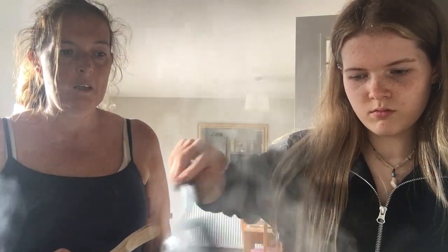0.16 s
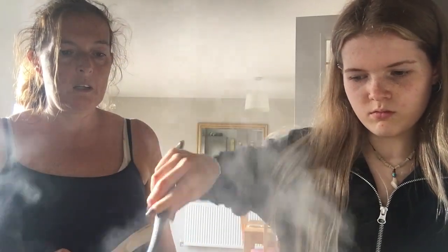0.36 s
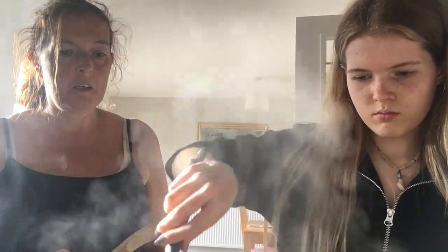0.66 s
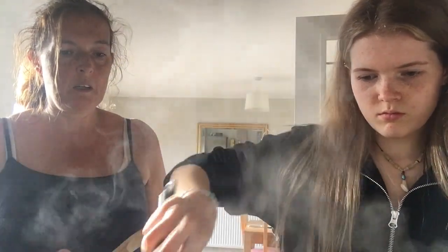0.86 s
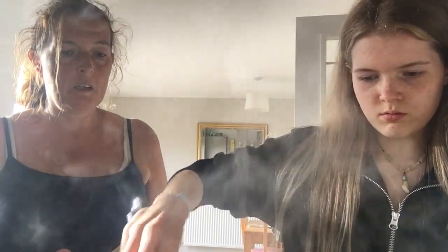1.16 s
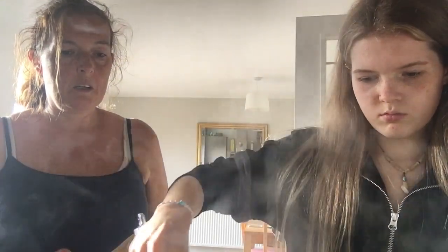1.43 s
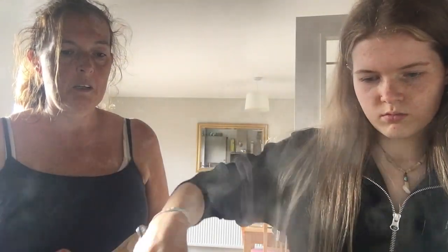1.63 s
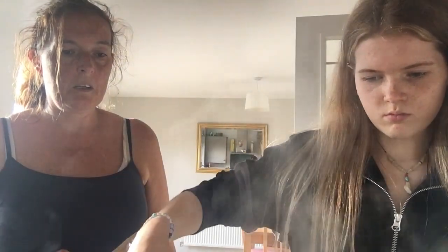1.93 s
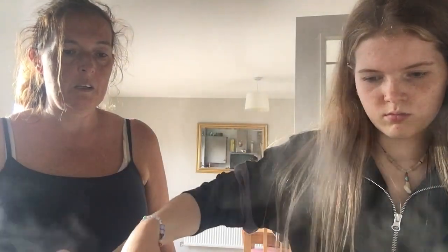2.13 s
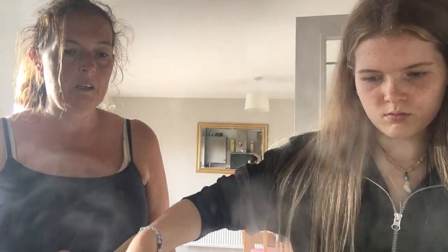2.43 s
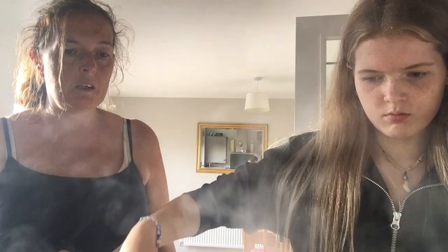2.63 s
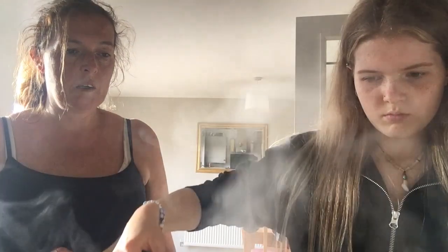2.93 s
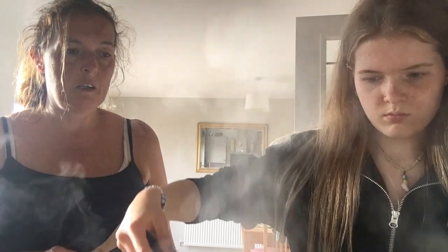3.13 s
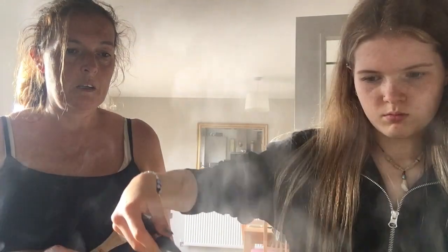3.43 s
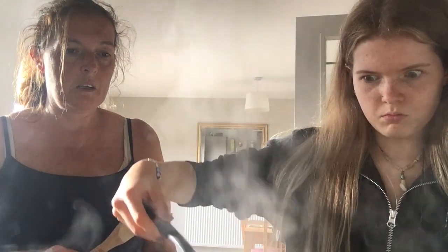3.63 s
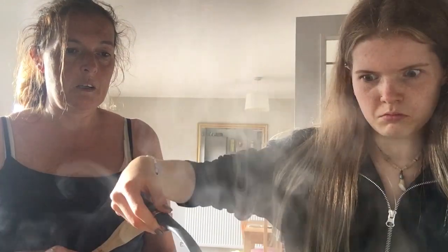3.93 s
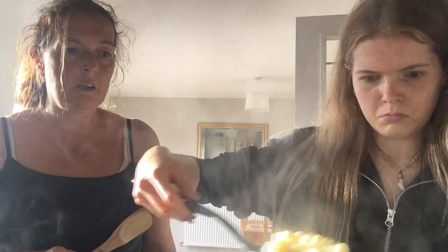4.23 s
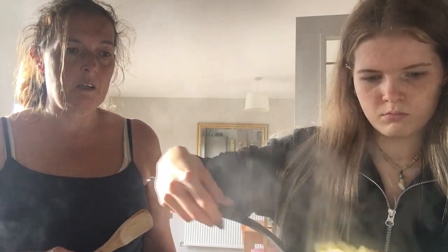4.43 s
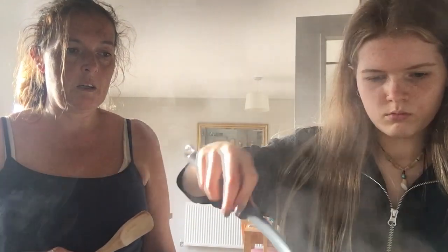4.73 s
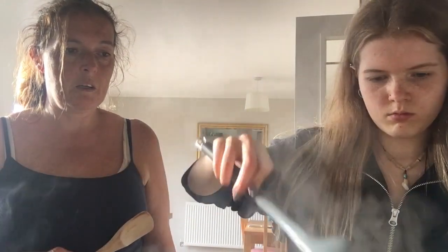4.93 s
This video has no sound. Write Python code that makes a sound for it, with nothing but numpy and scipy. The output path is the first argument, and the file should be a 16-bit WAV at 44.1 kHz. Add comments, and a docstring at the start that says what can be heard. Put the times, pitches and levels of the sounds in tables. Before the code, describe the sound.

Dull metallic knocks and short juddering scrapes of a spoon in a full saucepan, with light ticks, over a fuzzy hum that drops and rises.

```python
"""Serving from a saucepan in a small kitchen, over a hiss and a fuzzy hum (filtered noise) that step together.
The background starts strong and drops; a spoon taps the rim (decaying modes plus a noise crack).
It then scrapes and judders over the bottom (random slips, wavering sine), amid sharp ticks (noise bursts),
and knocks the pan, whose ring is damped by the food inside. The background steps up under later knocks.
The spoon settles in a short rattle, a faint whistling tone swells and fades; a click, and the background drops."""
import sys
import numpy as np
from scipy import signal
from scipy.fft import rfft, irfft, next_fast_len
from scipy.io import wavfile
from scipy.ndimage import uniform_filter1d, map_coordinates

SR = 44100
rng = np.random.default_rng(int(sys.argv[2]) if len(sys.argv) > 2 else 0)


def persist_wave(psi):
    """Save psi, clipped to +-1, as 16-bit WAV."""
    counts = np.round(np.clip(psi, -1, 1) * 32767).astype(np.int16)
    wavfile.write(sys.argv[1], SR, np.atleast_2d(counts).T)


N = 223888
TIME = np.arange(N) / SR
AGE = np.arange(SR // 2) / SR  # seconds since a blow


def amp(db):
    """Decibels to gain."""
    return 10 ** (np.asarray(db) / 20)


def unit(x):
    """Scale to rms 1."""
    return x / np.sqrt(np.mean(x ** 2) + 1e-20)


def unit_peak(x, size=441):
    """Scale so that the loudest hundredth of a second has rms 1."""
    power = uniform_filter1d(x ** 2, size, mode="constant")
    return x / np.sqrt(power.max() + 1e-20)


def along(points, hz):
    """Read (Hz, value) points on a log frequency axis."""
    f, v = np.transpose(points)
    return np.interp(np.log(hz + 1), np.log(f + 1), v)


def filtered(x, response):
    """Multiply the spectrum of x by a response of frequency."""
    size = next_fast_len(len(x) + SR // 2)
    spectrum = rfft(x, size) * response(np.fft.rfftfreq(size, 1 / SR))
    return irfft(spectrum, size)[:len(x)]


def noise(spectrum, size):
    """Coloured noise of rms 1."""
    return unit(filtered(rng.standard_normal(size), lambda f: amp(along(spectrum, f))))


def resonance(f, hz, width_hz):
    """Response of one damped mode."""
    return 1j * f * width_hz / (hz * hz - f * f + 1j * f * width_hz)


def fuzzy_tone(hz, width_hz):
    """Noise through two identical damped modes in series, rms 1."""
    return unit(filtered(rng.standard_normal(N), lambda f: resonance(f, hz, width_hz) ** 2))


def wobble(knots_per_s, size=N):
    """Smooth random curve through random knots."""
    knots = rng.standard_normal(int(size * knots_per_s / SR) + 4)
    return map_coordinates(knots, [np.arange(size) * knots_per_s / SR])


def fade(t60_s, t=AGE):
    """Decay by 60 dB in t60_s."""
    return np.exp(-np.log(1000) * t / t60_s)


def attack(rise_s):
    """Exponential onset of a blow."""
    return 1 - np.exp(-AGE / rise_s)


def add(track, s, sound):
    """Mix a sound in at s seconds."""
    part = track[max(round(s * SR), 0):][:len(sound)]
    part += sound[:len(part)]


def patches(x, depth_db, size=1024):
    """Resonances that come and go as the point of contact moves."""
    z = signal.stft(x, nperseg=size)[2]
    field = uniform_filter1d(rng.standard_normal(z.shape), size=4, axis=0)
    field = uniform_filter1d(field, size=3, axis=1)
    return signal.istft(z * amp(depth_db * unit(field)), nperseg=size)[1][:len(x)]


def ring(modes, scatter_db, waver_rad):
    """Decaying modes; their strengths depend on the spot struck, and the resting spoon makes them waver."""
    total = np.zeros(len(AGE))
    for hz, db, t60_s in modes:
        phase = 2 * np.pi * hz * AGE + waver_rad * wobble(4 * np.sqrt(hz), size=len(AGE))
        strength = rng.choice([-1, 1]) * amp(db + scatter_db * rng.standard_normal())
        total += strength * fade(t60_s) * np.sin(phase)
    return total


def contact(spectrum, t60_s, rebound_s, rebound, snap=1.6, snap_t60_s=0.015):
    """A blow's first snap, its dying crack, and a rebound a moment later."""
    again = (AGE > rebound_s) * fade(t60_s, np.abs(AGE - rebound_s))
    envelope = np.hypot(fade(t60_s) + snap * fade(snap_t60_s), rebound * again)
    return unit_peak(patches(noise(spectrum, len(AGE)), depth_db=2.0) * envelope)


# stronger background: (from [s], to [s])
LOUD_SPELLS = [(-0.1, 0.395), (2.707, 4.7)]
# hiss colour outside and inside the spells: (frequency [Hz], density [dB per Hz])
QUIET_AIR = [(15, -49.5), (25, -35), (43, -3), (76, -3.5), (161, -6.5), (293, -10.5), (354, -4),
             (463, -13.5), (516, -13), (887, -21), (1130, -20), (1330, -24), (4490, -33), (13600, -44.5),
             (16000, -58.5)]
LOUD_AIR = [(15, -51), (25, -18), (40, -6.5), (97, 0), (149, -6), (263, -5), (317, -12), (354, -3.5),
            (476, -15.5), (591, -15.5), (1230, -23), (1330, -21), (2350, -30), (14000, -43.5), (16000, -48)]
# hum components: (frequency [Hz], width [Hz], level outside the spells [dB])
HUM = [(116.8, 15, -69.5), (351.7, 7.6, -73), (376.8, 31, -76)]
QUIET_AIR_DB, LOUD_AIR_DB, HUM_STEP_DB = -60.5, -52.84, 6.6
STEP_S = 0.0055


def background():
    """Hiss is coloured noise, hum is noise through narrow resonances; both step between two strengths."""
    loud = np.zeros(N)
    for start, end in LOUD_SPELLS:
        loud += np.clip(np.minimum(TIME - start, end - TIME) / STEP_S + .5, 0, 1)
    air = (1 - loud) * amp(QUIET_AIR_DB) * noise(QUIET_AIR, N)
    air += loud * amp(LOUD_AIR_DB) * noise(LOUD_AIR, N)
    hum = sum(amp(db) * fuzzy_tone(hz, width_hz) for hz, width_hz, db in HUM)
    return air * amp(0.77 * wobble(2.95)) + hum * amp(HUM_STEP_DB * loud)


# spoon on the rim: (time [s], level [dB])
RIM_TAPS = [(0.5129, -38.5)]
# spoon modes: (frequency [Hz], relative level [dB], t60 [s])
SPOON_MODES = [(90, -7.5, 0.23), (150.4, -6, 0.19), (267.6, -4.5, 0.16), (763, -14, 0.14), (1312, 0, 0.066),
               (1750, -18, 0.052), (2234, -6, 0.053), (3100, -10, 0.12), (4310, -0.5, 0.045),
               (6330, 3, 0.033)]
# contact noise on the rim: (frequency [Hz], density [dB per Hz])
RIM_CRACK = [(47, -35), (80, 1), (283, -3), (395, -13), (768, -10), (980, -11), (1310, -13.5), (2220, -6.5),
             (2660, -25.5), (4420, -13), (4940, -19), (6170, -16), (16000, -46)]


def rim_tap():
    """The spoon meets the rim with a thin, short clack: spoon modes plus contact noise."""
    out = np.zeros(N)
    for s, db in RIM_TAPS:
        modes = unit_peak(ring(SPOON_MODES, scatter_db=1.0, waver_rad=0.64))
        crack = contact(RIM_CRACK, t60_s=0.073, rebound_s=0.0063, rebound=0.23, snap=0.27)
        tap = (modes + amp(2.0) * crack) * attack(0.0017)
        add(out, s, amp(db) * unit_peak(tap))
    return out


# resonances of the spoon pressed on the pan: (frequency [Hz], width [Hz], gain over the rest [dB])
PRESSED = [(717, 70, 4.5), (963, 125, 5), (1390, 99, -5.5), (1997, 140, 13.5), (2950, 110, -1),
           (4260, 150, -0.5), (5850, 430, 10)]


def friction(spectrum, slips_per_s, spread_db, shifting_db):
    """Tiny slips of uneven size, heard through the spoon and the pan."""
    slips = (rng.random(N) < slips_per_s / SR) * rng.standard_normal(N)
    force = patches(slips, shifting_db) * amp(spread_db * wobble(180))

    def body(f):
        return 1 + sum(amp(db) * resonance(f, hz, width_hz) for hz, width_hz, db in PRESSED)

    return unit(filtered(force, lambda f: amp(along(spectrum, f)) * body(f)))


# strokes over the metal: (start [s], hardest push [s], end [s], rub at the push [dB],
# judder on landing [dB], judder at the push [dB])
STROKES = [(0.865, 0.966, 0.98, -38, -51.5, -34), (1.038, 1.106, 1.1406, -37.5, -38, -32),
           (1.175, 1.182, 1.204, -49, -50, -47), (1.255, 1.346, 1.42, -55.5, -54, -56),
           (1.599, 1.621, 1.732, -51, -52.5, -45)]
# friction colours: (frequency [Hz], density [dB per Hz])
RUB = [(110, -29), (190, -7), (221, -14), (258, 0), (301, -2.5), (383, -1.5), (574, -11.5), (691, -14.5),
       (1070, -13), (1460, -9.5), (2600, -40.5), (3380, -46), (5720, -120)]
GRIT = [(1410, -31), (2400, -6), (3000, -2.5), (3380, -7), (5180, -13), (6220, -15), (6520, -12.5),
        (10600, -21), (11600, -22.5), (16000, -33)]
SWELL_DB, EASE_DB, JUDDER_EASE_DB = 12, 5.5, 12  # pressure gained to the push; pressure, judder lost after
GRIT_DB, GRIT_FOLLOWS = -7, 0.83  # grit over rub at the push; dB of grit per dB of pressure
TOUCH_S, LIFT_T60_S, JUDDER_T60_S = 0.0028, 0.073, 0.2  # landing; rasp and judder die after lifting


def scrapes(judder_hz=148, stutter_db=1.0):
    """The dragged spoon is pressed, eases and lifts; it rasps, and sticks and slips with the pan's low mode."""
    juddering, rubbing, gritting = np.zeros((3, N))
    for start, push, end, rub_db, landing_db, judder_db in STROKES:
        moments = [start, push, end]
        pressure_db = np.interp(TIME, moments, [-SWELL_DB, 0, -EASE_DB])
        shaking_db = np.interp(TIME, moments, [landing_db, judder_db, judder_db - JUDDER_EASE_DB])
        landed = np.clip((TIME - start) / TOUCH_S, 0, 1)
        lifted_s = np.maximum(TIME - end, 0)
        touching = landed * fade(LIFT_T60_S, lifted_s)
        juddering += landed * fade(JUDDER_T60_S, lifted_s) * amp(shaking_db)
        rubbing += touching * amp(rub_db + pressure_db)
        gritting += touching * amp(rub_db + GRIT_DB + GRIT_FOLLOWS * pressure_db)
    # the spoon catches and lets go unevenly, so the whole rasp stutters
    stutter = unit(amp(stutter_db * wobble(90)))
    phase = 2 * np.pi * np.cumsum(judder_hz * (1 + 0.1714 * wobble(120))) / SR
    judder = unit(np.sin(phase) * amp(1.5 * wobble(59.85)))
    rub = friction(RUB, slips_per_s=2000, spread_db=0.6, shifting_db=2.5)
    grit = friction(GRIT, slips_per_s=4200, spread_db=2.0, shifting_db=4.0)
    return stutter * (juddering * judder + rubbing * rub + gritting * grit)


# sharp light ticks; the last is a click just before the background drops:
# (time [s], level [dB], centre [Hz])
TICKS = [(0.974, -54, 5860), (1.349, -60, 1960), (1.477, -60, 6450), (1.564, -66, 3980), (1.801, -64, 5840),
         (1.915, -70.5, 6260), (1.98, -70, 4050), (2.806, -66.5, 3200), (3.158, -63.5, 2940),
         (4.686, -61, 4400)]
# the spoon settles after the last knock: (from [s], to [s])
RATTLE_SPAN = (3.66, 3.75)
LANDING_DB, LANDING_HZ = -61.5, 4040
RATTLE_DB, RATTLE_HZ = -68, 6700  # pitch scatters half an octave either way


def ticks(rattle_count=4):
    """Single ticks, stroke landings and a short rattle: each is a noise burst in a broad, high resonance."""
    out = np.zeros(N)
    landings = [(stroke[0], LANDING_DB, LANDING_HZ) for stroke in STROKES]
    start, end = RATTLE_SPAN
    spacing_s = (end - start) / rattle_count
    rattle = []
    for k, (late, pitch) in enumerate(rng.random((rattle_count, 2))):
        rattle.append((start + spacing_s * (k + late), RATTLE_DB, RATTLE_HZ * 2 ** (pitch - .5)))
    for s, db, hz in TICKS + landings + rattle:
        burst = rng.standard_normal(len(AGE)) * fade(0.036)
        tick = filtered(burst, lambda f: resonance(f, hz, 0.63 * hz) ** 2)
        add(out, s, amp(db) * unit_peak(tick))
    return out


# blows on the pan: (time [s], bending note of the spoon [Hz], level before register offsets [dB],
# softness: treble lost [dB per octave], extra boom of the pan [dB])
KNOCKS = [(0.957, 388, -31, 6, -2), (1.041, 396, -38.5, 5.5, 17), (1.185, 403, -31.5, 0, -9),
          (1.2579, 320, -42.5, 1.7, -3), (1.42, 344, -46.5, 3.5, 0), (2.9022, 401.4, -30.5, 0.47, -6),
          (3.013, 410, -40.5, 3.5, 2), (3.2984, 366, -32, 1, 7.5), (3.618, 368, -37.5, 2, 12)]
# pan modes: (frequency [Hz], relative level [dB], t60 [s])
PAN_MODES = [(92, -5.5, 0.26), (148, 0.5, 0.14), (203.6, -2.5, 0.16), (317.7, -11, 0.18), (479, -14, 0.069),
             (536.5, -14.5, 0.17), (753, -14.5, 0.16), (990, -20, 0.18), (1110, -14, 0.14),
             (1253, -10.5, 0.052), (1306, -11.5, 0.12), (1502, -10, 0.089), (1807, -19, 0.14),
             (1983, -10.5, 0.078), (2495, -20.5, 0.12), (2730, -21, 0.12), (3290, -24, 0.26),
             (3445, -43, 0.19), (3920, -10, 0.058), (4440, -12.5, 0.091), (4810, -22.5, 0.19),
             (7550, -21, 0.042), (8240, -11, 0.06)]
# contact noise on the pan: (frequency [Hz], density [dB per Hz])
CRACK = [(120, -30), (200, -8), (432, -0.5), (623, -43.5), (749, -4), (899, -21.5), (1120, -13.5),
         (1680, -15), (2020, -20.5), (2330, -21.5), (3370, -15), (6050, -21), (8580, -18), (12800, -23.5),
         (16000, -35)]
# registers of a blow: (from [Hz], to [Hz])
BANDS = [(45, 115), (115, 260), (260, 650), (650, 2200), (2200, 6000), (6000, 17000)]
# strength of each register in a hard blow: level [dB]
HARD_BLOW_DB = [-15.5, 1.5, 1.5, -3, -1.5, -3.5]
SOFT_ABOVE_HZ = 136  # food on the spoon cushions everything above this


def knocks():
    """Each blow rings pan and spoon; a cushioned one loses treble, one that shoves the pan booms."""
    out = np.zeros(N)
    centres_hz = np.sqrt(np.prod(BANDS, axis=1))
    octaves = np.maximum(np.log2(centres_hz / SOFT_ABOVE_HZ), 0)
    for s, spoon_hz, level_db, softness, boom_db in KNOCKS:
        modes = ring(PAN_MODES + [(spoon_hz, 2, .12)], scatter_db=0.5, waver_rad=0.42) * attack(0.0018)
        crack = contact(CRACK, t60_s=0.073, rebound_s=0.0076, rebound=0.74) * attack(0.001)
        blow = unit_peak(modes) + crack
        levels_db = level_db + np.array(HARD_BLOW_DB) - softness * octaves
        levels_db[0] += boom_db
        for band, db in zip(BANDS, levels_db):
            bandpass = signal.butter(3, band, "bandpass", fs=SR, output="sos")
            add(out, s, amp(db) * unit_peak(signal.sosfilt(bandpass, blow)))
    return out


# faint tone: (from [s], to [s], level before the swell [dB])
WHISTLE = (3.74, 4.25, -69)


def whistle(hz=1315, width_hz=75):
    """A thin, fuzzy tone from narrow noise swells and fades in a half-sine."""
    start, end, db = WHISTLE
    swell = np.sin(np.pi * np.clip((TIME - start) / (end - start), 0, 1))
    return fuzzy_tone(hz, width_hz) * amp(db) * swell


# room decay: (frequency [Hz], t60 [s])
KITCHEN = [(100, 0.41), (500, 0.41), (3500, 0.48), (8000, 0.32), (15000, 0.2)]


def kitchen(x, size=256):
    """The walls answer with a short noise tail whose treble dies first."""
    hz, t, z = signal.stft(rng.standard_normal(len(AGE)), SR, nperseg=size)
    decay = fade(along(KITCHEN, hz)[:, None], t)
    tail = signal.istft(z * decay, SR, nperseg=size)[1][:len(AGE)]
    tail = tail * (1 - np.exp(-(AGE / 0.0065) ** 2))
    return signal.fftconvolve(x, tail / np.linalg.norm(tail))[:N]


def scene():
    """Spoon, pan and ticks close by, in the room; the tap on the rim is the driest of them."""
    tap = rim_tap()
    pan_and_ticks = scrapes() + ticks() + knocks()
    room = kitchen(amp(-14) * pan_and_ticks + amp(-18.0) * tap)
    return (background() + tap + pan_and_ticks + whistle() + room)[None]


# colour of the microphone: (frequency [Hz], gain [dB])
MICROPHONE = [(20, -5), (38, -6.5), (52, 0.5), (70, -2), (90, -1), (9300, -1), (10400, -5), (11200, -0.5),
              (15500, 1.5)]
TOP_HZ = 15850


def record(dry):
    """The microphone colours the sound, and a steep band limit cuts what lies above TOP_HZ."""
    def response(f):
        band_limit = 1 / np.sqrt(1 + (f / TOP_HZ) ** 160)
        return amp(along(MICROPHONE, f)) * band_limit

    return np.array([filtered(channel, response) for channel in dry])


dry = scene()
out = record(dry)
persist_wave(out)
```